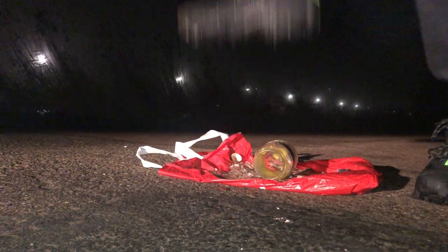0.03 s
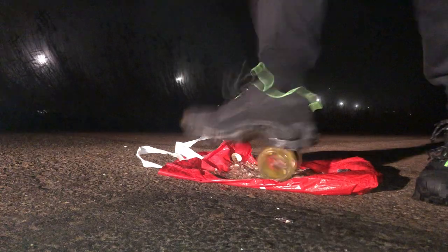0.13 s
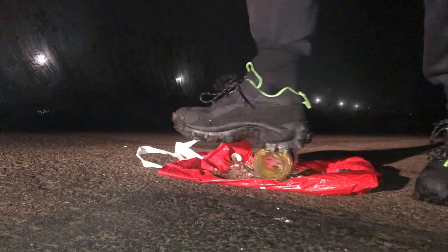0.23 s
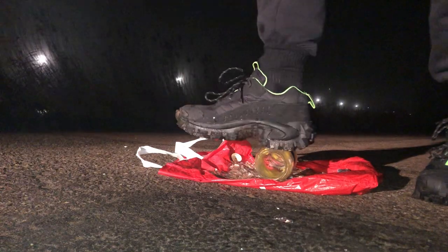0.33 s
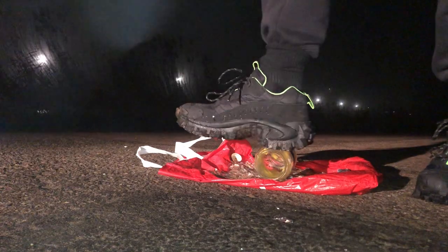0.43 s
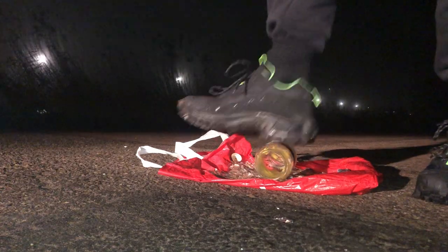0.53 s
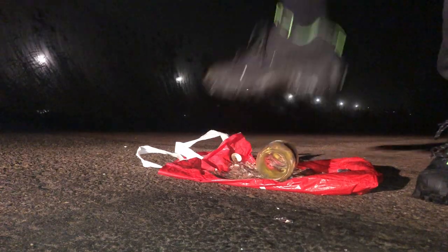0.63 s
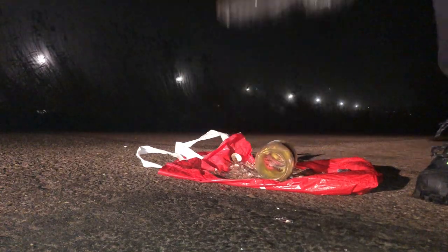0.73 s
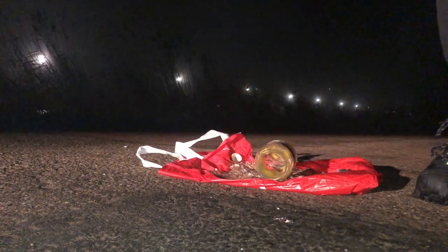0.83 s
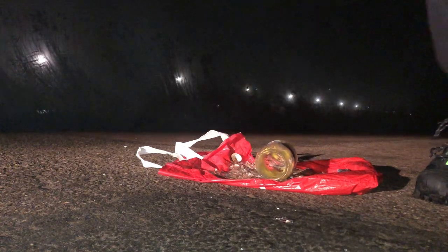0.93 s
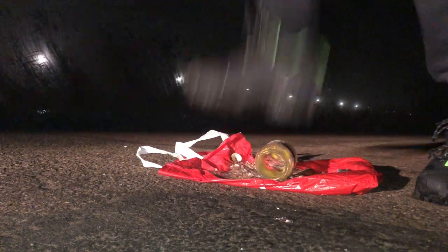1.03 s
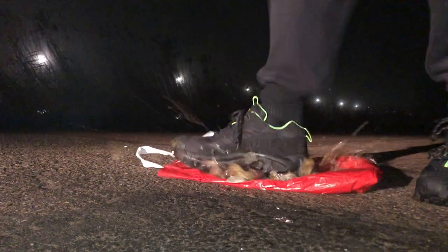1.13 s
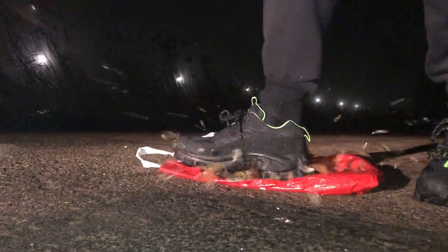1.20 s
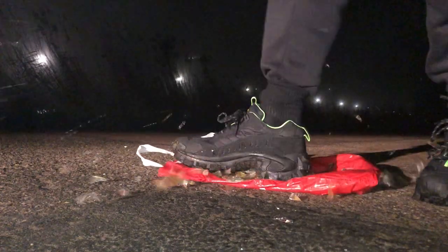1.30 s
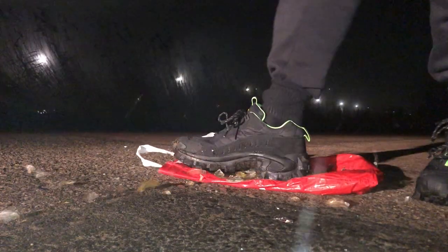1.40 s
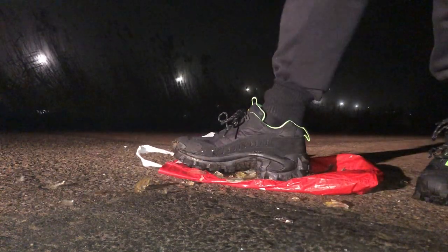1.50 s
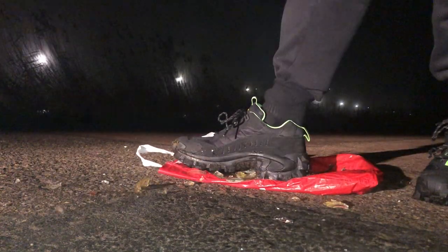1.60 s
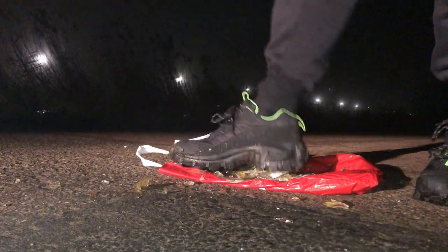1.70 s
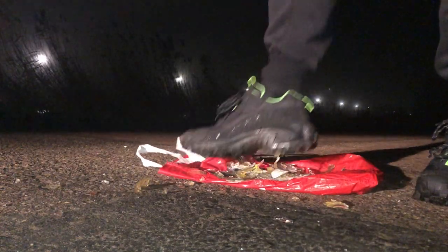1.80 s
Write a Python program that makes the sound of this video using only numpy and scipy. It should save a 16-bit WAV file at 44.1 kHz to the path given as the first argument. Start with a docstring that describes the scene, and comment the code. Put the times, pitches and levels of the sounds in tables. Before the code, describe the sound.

Close, dry outdoor sound of glass being stomped: first a hollow knock with ringing and grinding, about a second later a loud shattering burst, bag crackle and small pieces ticking down, with quiet night hum behind.

```python
"""A low hum of the town at night is heard first, as shaped noise with a few wavering tones. A boot then
stamps on a glass jar lying on a plastic bag on asphalt: the jar rings, skids and grinds, as grit noise
through resonances and damped modes. A second stamp bursts it: snaps of noise crack, a cloud of short
notes shimmers, the sole crushes the pieces, the bag crackles and shards tinkle down on high modes."""
import sys
import numpy as np
from scipy import signal
from scipy.fft import rfft, irfft, next_fast_len
from scipy.io import wavfile
from scipy.ndimage import map_coordinates

SR = 44100
rng = np.random.default_rng(int(sys.argv[2]) if len(sys.argv) > 2 else 0)


def transcribe(signal):
    """Save signal, clipped to [-1, 1], as a 16-bit WAV file at the path in sys.argv[1]."""
    frames = np.atleast_2d(signal).T
    limited = np.clip(frames, -1, 1)
    pcm = np.round(limited * 32767).astype(np.int16)
    wavfile.write(sys.argv[1], SR, pcm)


N = 83790
T = np.arange(SR // 2) / SR  # time axis of one short event, s
SCENE_T = np.arange(N) / SR  # time axis of the whole scene, s


def amp(db):
    """Decibel law: level in dB to amplitude ratio."""
    return 10 ** (np.asarray(db) / 20)


def unit(x):
    """Normalisation to an rms of 1."""
    return x / np.sqrt(np.mean(x ** 2) + 1e-20)


def along(points, hz):
    """Interpolation of (f/Hz, value) points on a logarithmic frequency axis."""
    f, v = np.transpose(points)
    return np.interp(np.log(hz + 1), np.log(f + 1), v)


def level(rows):
    """Envelope: gain per sample, linear in dB between (t/s, level/dB) points."""
    return amp(np.interp(SCENE_T, *np.transpose(rows)))


def wobble(rate):
    """Slow random modulation: a smooth curve through random knots, rate of them a second."""
    knots = rng.standard_normal(int(N * rate / SR) + 4)
    return map_coordinates(knots, [SCENE_T * rate])


def filtered(x, response):
    """Linear filtering: the spectrum of x times a response of frequency."""
    m = next_fast_len(len(x) + SR // 2)
    return irfft(rfft(x, m) * response(np.fft.rfftfreq(m, 1 / SR)), m)[:len(x)]


def colour(x, spectrum):
    """Spectral shaping: x filtered by (f/Hz, level/dB) points, at rms 1."""
    return unit(filtered(x, lambda hz: amp(along(spectrum, hz))))


def grains(spiky_db=0, size=len(T)):
    """Granular noise: white noise whose size jumps every half millisecond."""
    sizes = amp(spiky_db * np.clip(rng.standard_normal(size), -2.5, 2.5))
    return unit(rng.standard_normal(size) * sizes[np.arange(size) // 22])


def fade(t60, rise=1e-4):
    """Exponential decay: a straight rise, then a fall of 60 dB in t60."""
    return np.minimum(T / rise, 1) * 1000.0 ** (-np.maximum(T - rise, 0) / t60)


def ring(hz, t60, rise=1e-4):
    """Damped oscillation: one decaying mode."""
    return np.sin(2 * np.pi * hz * T) * fade(t60, rise)


def add(track, s, x):
    """Superposition: mix x into the track at s seconds."""
    part = track[max(round(s * SR), 0):][:len(x)]
    part += x[:len(part)]


# level of the background above its deep bass (t/s, level/dB)
HUM_LEVEL = [(0, -44.5), (0.36, -43.5), (0.64, -44), (1.14, -44.5), (1.25, -55.5), (1.45, -55), (1.7, -54),
             (1.9, -48.5)]
# level of its deep bass (t/s, level/dB)
RUMBLE_LEVEL = [(0, -45), (0.5, -49), (1.0, -42.5), (1.3, -54.5), (1.6, -54.5), (1.9, -61.5)]
# noise spectrum of the background (f/Hz, level/dB per Hz)
HUM_SPECTRUM = [(15, -41.5), (25, -15.5), (59, -2), (236, -5.5), (451, -13), (516, -6.5), (677, -23),
                (775, -13.5), (936, -22.5), (1700, -17), (2480, -29.5), (3340, -23), (5000, -33),
                (6740, -35.5), (8590, -40.5), (14400, -43.5), (16000, -67.5)]
# low tones (f/Hz, level/dB over the background level)
HUM_TONES = [(68, -20.5), (118.4, -13), (193.5, -12), (240, -11.5), (312, -13.5), (511, -14)]
HUM_NOISE_DB, HUM_WAVER_RAD = -2, 1
RUMBLE_HZ = 160  # upper edge of the deep bass


def hum():
    """Phase and amplitude modulation: low tones waver in a far rumble, which drops around the burst."""
    tones = np.zeros(N)
    for hz, db in HUM_TONES:
        phase = 2 * np.pi * hz * SCENE_T + HUM_WAVER_RAD * wobble(11.58)
        swell = amp(2.5 * wobble(7.8))
        tones += amp(db) * unit(np.sin(phase) * swell)
    whole = tones + amp(HUM_NOISE_DB) * colour(grains(size=N), HUM_SPECTRUM)
    bass = filtered(whole, lambda hz: 1 / (1 + (hz / RUMBLE_HZ) ** 4))
    return level(HUM_LEVEL) * (whole - bass) + level(RUMBLE_LEVEL) * bass


# resonances of the jar pressed under the sole (f/Hz, width/Hz, relative level/dB)
PRESSED_MODES = [(1070, 310, -7.5), (3017, 252, 2.5), (4300, 640, -11), (5200, 170, 0), (6780, 125, -7),
                 (8030, 100, 1), (8560, 260, -1), (10000, 160, -9), (10230, 200, -0.5), (11100, 190, 2.5),
                 (12900, 400, -3.5), (13900, 83, 5.5), (14400, 170, -2), (14900, 300, -2.5)]
# grit heard directly (f/Hz, level/dB per Hz)
GRIT_SPECTRUM = [(200, -2), (900, -2.5), (2000, -8.5), (5000, -0.5), (10000, -4), (16000, -8.5)]
GRIT_DB, GRIT_SPIKY_DB = -3.5, 5  # direct grit level, spread of the grain sizes
PRESSED_VARY_DB = 5  # spread of each resonance's level between strokes


def scrape(stroke):
    """Source and filter: grit under a stroke is heard directly and through the pressed jar's resonances."""
    grit = grains(GRIT_SPIKY_DB, size=len(stroke))
    changes = rng.normal(0, PRESSED_VARY_DB, len(PRESSED_MODES))

    def body(f):
        """Modal response: resonances of alternating sign, at rms 1 over frequency."""
        h = 0
        for k, (centre, width, db) in enumerate(PRESSED_MODES):
            damping = 1j * f * width
            h = h + (-1) ** k * amp(db + changes[k]) * damping / (centre ** 2 - f ** 2 + damping)
        return h / np.sqrt(np.mean(np.abs(h) ** 2))

    through_jar = filtered(grit * stroke, body)
    return through_jar + amp(GRIT_DB) * colour(grit, GRIT_SPECTRUM) * stroke


# free modes of the jar's wall (f/Hz, mean level/dB, t60/s)
WALL_MODES = [(2459, -12, .25), (2907, -16, .2), (4037, -16, .2), (5059, -8, .13), (5547, -4, .13),
              (5792, -9, .19), (6874, -2, .1), (7650, -11, .1), (8403, -6, .07), (9060, -16, .1),
              (9658, -9, .07), (14040, -15, .11), (15250, -19, .1)]
WALL_WAVER_RAD = 0.22  # unsteadiness of each mode's phase


def wall_ring(rise):
    """Modal superposition: the struck glass wall rings in many damped, slightly unsteady modes."""
    wall = 0
    for hz, db, t60 in WALL_MODES:
        waver = WALL_WAVER_RAD * np.interp(T, np.linspace(0, T[-1], 100), rng.standard_normal(100))
        gain = amp(db + rng.normal(0, 1))
        wall = wall + gain * np.sin(2 * np.pi * hz * T + waver) * fade(t60, rise)
    return wall


# contacts of the whole jar with the asphalt
# (t/s, grit level/dB, rise/s, grit t60/s, wall ring level/dB, air note level/dB)
CONTACTS = [(0.2076, -21.5, 0.00067, 0.17, -56.5, -49), (0.2178, -21.5, .001, 0.076, -22.5, -18),
            (0.2275, -27, 0.0038, .06, -29, -47), (0.2796, -18.5, 0.0011, 0.032, -37, -26),
            (0.359, -26.5, 0.0038, 0.071, -58, -40), (0.397, -42, 0.008, .08, -62, -40),
            (0.429, -37, 0.001, 0.052, -64.5, -38), (0.4418, -44, 0.00055, 0.022, -70, -42),
            (0.4528, -30.5, 0.00055, 0.049, -44, -33), (0.478, -47.5, 0.00065, .04, -74, -59),
            (0.5337, -42, .001, 0.098, -52, -36), (0.554, -44, 0.0022, 0.039, -72, -50)]
# steady grinding as the jar rolls (t/s, level/dB)
ROLL_LEVEL = [(0.2, -69), (0.24, -45), (0.3, -49.5), (0.34, -52.5), (0.38, -45.5), (0.46, -55.5),
              (0.5, -59), (0.56, -58), (0.6, -78), (0.7, -100)]
AIR_HZ, AIR_T60_S, AIR_RISE_S = 396, 0.11, 0.0076  # note of the air in the jar
AIR_GLIDE_HZ_PER_S = 54  # later contacts sound a higher air note


def jar():
    """Frictional and impact excitation: the jar skids and rolls, its wall rings and the air inside hoots."""
    first_s = CONTACTS[0][0]
    out = scrape(level(ROLL_LEVEL) * (np.arange(N) > first_s * SR))
    for s, grit_db, rise, t60, wall_db, air_db in CONTACTS:
        air = ring(AIR_HZ + AIR_GLIDE_HZ_PER_S * (s - first_s), AIR_T60_S, AIR_RISE_S)
        grit = scrape(fade(t60, rise))
        add(out, s, amp(grit_db) * grit + amp(wall_db) * wall_ring(rise) + amp(air_db) * air)
    return out


# decay of the open ground (f/Hz, t60/s)
YARD_T60 = [(200, 0.45), (2000, 0.34), (14000, 0.5)]
YARD_DB = -22


def yard(x):
    """Reverberation: convolution with decaying noise gives the answer of the open ground and far walls."""
    hz, t, z = signal.stft(grains(), SR, nperseg=256)
    decay = amp(-60 * t / along(YARD_T60, hz)[:, None])
    tail = signal.istft(z * decay, SR, nperseg=256)[1]
    return signal.fftconvolve(x, tail / np.linalg.norm(tail))[:N]


# short notes of the jar while the sole pinches it (t/s, level/dB, f/Hz, t60/s)
CLACKS = [(0.2077, -20, 3000, 0.022), (0.2145, -18, 6870, .08), (0.2275, -24, 2990, .03),
          (0.28, -18, 2980, 0.014), (0.2815, -18, 8460, 0.047), (0.3622, -29, 3004, .035)]


def clacks():
    """Damped modes: the pinched jar sounds short single notes."""
    out = np.zeros(N)
    for s, db, hz, t60 in CLACKS:
        add(out, s, amp(db) * ring(hz, t60, rise=.001))
    return out


# rubber sole on the jar and the ground; the pitch sinks as the contact spreads
# (t/s, level/dB, starting f/Hz, rise/s, t60/s, sinking/octaves per s)
KNOCKS = [(0.2081, -4.5, 1136, 0.00076, 0.016, 36.5), (0.2104, -4, 354, 0.0027, 0.01, 96),
          (0.2299, -17, 1170, 0.0018, 0.0073, 40), (0.2806, -20, 1048, 0.00095, 0.021, 35),
          (0.2944, -29.5, 1780, .001, 0.028, 31), (1.002, -37, 375, 0.011, 0.084, 62),
          (1.136, -31, 1870, 0.00051, .012, 315), (1.144, -26, 196, 0.0021, 0.066, 15),
          (1.1538, -4.5, 1305, 0.00075, 0.014, 99), (1.1568, -11.5, 350, 0.0018, 0.0187, 60),
          (1.1593, -11, 1682, 0.0016, 0.027, 431), (1.1846, -27, 525, .003, .02, 25),
          (1.1952, -25, 1220, .002, 0.013, 85), (1.338, -40, 1150, .002, .014, 30)]
KNOCK_NOISE_DB, KNOCK_WIDTH_OCT, KNOCK_LOW_HZ = -15, 0.75, 110  # roughness, its half width, lower edge


def boot():
    """Contact stiffness: the sole knocks hollowly, each knock sinking in pitch as the contact spreads."""
    out = np.zeros(N)
    for s, db, hz, rise, t60, sink in KNOCKS:
        note = np.sin(2 * np.pi * np.cumsum(hz * 2 ** (-sink * T)) / SR)

        def around_note(f):
            """Resonance curve centred on the starting pitch."""
            return 1 / (1 + (np.log2((f + 1) / hz) / KNOCK_WIDTH_OCT) ** 2)

        roughness = unit(filtered(grains(), around_note))
        add(out, s, amp(db) * (note + amp(KNOCK_NOISE_DB) * roughness) * fade(t60, rise))
    return signal.sosfilt(signal.butter(2, KNOCK_LOW_HZ, "high", fs=SR, output="sos"), out)


# sharp cracks of glass and grit (t/s, level/dB, t60/s, body level/dB relative to the edge)
CRACKS = [(0.2197, -9.5, 0.0085, 1), (0.6514, -33, 0.0026, -27), (0.7022, -38, 0.0061, -20),
          (1.1363, -36, 0.024, 4), (1.1532, -23, .022, 2), (1.159, -9.5, 0.0099, -1.5),
          (1.1642, -21.5, 0.036, -25), (1.36, -39, .008, -3), (1.394, -33, .006, -10),
          (1.4095, -20, 0.0025, -16.5), (1.4704, -32, 0.0067, -21), (1.4885, -41, 0.014, -16.5),
          (1.544, -38.5, 0.0025, -15), (1.562, -38, .005, -14), (1.5792, -37, .01, -29),
          (1.583, -38.5, 0.0052, -2), (1.6017, -29.5, 0.0039, -6), (1.6757, -41.5, 0.0024, -6),
          (1.695, -44.5, .015, -19), (1.7423, -33, 0.0044, -4.5)]
# bright edge of a crack (f/Hz, level/dB per Hz)
EDGE_SPECTRUM = [(300, -29), (2000, -12), (4000, -0.5), (8000, 1.5), (16000, 0)]
# duller body of a crack (f/Hz, level/dB per Hz)
BODY_SPECTRUM = [(100, -22), (400, -1), (900, -7.5), (1600, -3.5), (3200, -2.5), (6000, -23), (16000, -40)]


def cracks():
    """Impulsive fracture: glass and grit crack in short snaps of broadband noise."""
    out = np.zeros(N)
    for s, db, t60, body_db in CRACKS:
        snap = colour(grains(), EDGE_SPECTRUM) + amp(body_db) * colour(grains(), BODY_SPECTRUM)
        add(out, s, amp(db) * fade(t60) * snap)
    return out


BURST_S = 1.16
SPLINTER_FALL_S = .11  # mean flight time
SPLINTER_DB, SPLINTER_RANGE_DB = -41.5, 14  # loudest splinter, spread below it
SPLINTER_FADE_DB_PER_S = 35  # late splinters land more softly
SPLINTER_LOW_HZ, SPLINTER_HIGH_HZ, SPLINTER_T60_S = 3023, 15460, 0.042  # pitch range, mean decay


def splinters(count=420):
    """Random superposition: tiny splinters ring at exponentially thinning times, a dense shimmer."""
    out = np.zeros(N)
    for when, pitch, size, life in rng.random((count, 4)):
        flight = -SPLINTER_FALL_S * np.log(1 - when)
        hz = SPLINTER_LOW_HZ + (SPLINTER_HIGH_HZ - SPLINTER_LOW_HZ) * pitch
        db = SPLINTER_DB - SPLINTER_RANGE_DB * size - SPLINTER_FADE_DB_PER_S * flight
        add(out, BURST_S + flight, amp(db) * ring(hz, SPLINTER_T60_S * (.5 + life)))
    return out


# crumbs of glass and the bag crackling under the sole (t/s, level/dB)
CRACKLE_LEVEL = [(1.161, -80), (1.17, -34), (1.23, -49), (1.3, -52.5), (1.39, -48), (1.48, -57.5),
                 (1.58, -56), (1.66, -65.5), (1.75, -57), (1.8, -60.5), (1.9, -68)]
# crinkling of the bag (f/Hz, level/dB per Hz)
CRINKLE_SPECTRUM = [(300, 3.5), (1000, 5), (2500, 5), (5000, 5), (10000, -1.5), (16000, -1.5)]
CRINKLE_DB, CRINKLE_SPIKY_DB = -3, 7  # level, spread of the grain sizes
TICKS_PER_S, TICK_DB, TICK_RANGE_DB, TICK_T60_S = 220, -0.5, 24, 0.0027


def crackle():
    """Random impulse process: the bag crinkles and crumbs of glass tick as the weight settles on them."""
    crinkle = colour(grains(CRINKLE_SPIKY_DB, size=N), CRINKLE_SPECTRUM)
    snaps = (rng.random(N) < TICKS_PER_S / SR) * amp(-TICK_RANGE_DB * rng.random(N))
    tick_envelope = signal.fftconvolve(snaps, fade(TICK_T60_S))[:N]
    ticks = colour(tick_envelope * rng.standard_normal(N), EDGE_SPECTRUM)
    after_burst = np.arange(N) > BURST_S * SR
    return level(CRACKLE_LEVEL) * (amp(CRINKLE_DB) * crinkle + amp(TICK_DB) * ticks) * after_burst


# the sole crushing and rubbing the pieces
# (t/s, level/dB, rise/s, t60/s, fizz level/dB relative to the crunch)
CRUSHES = [(1.178, -24, 0.0066, 0.065, 1), (1.203, -31.5, 0.0045, 0.067, -3),
           (1.221, -47.5, 0.022, 0.43, -25), (1.752, -51, .002, 0.045, 7.5)]
# crunch of the pieces (f/Hz, level/dB per Hz)
CRUSH_SPECTRUM = [(60, -1), (250, 2.5), (500, -2), (750, -4), (1150, 2), (1700, -1.5), (2800, -5.5),
                  (4500, -6.5), (8000, -17), (16000, -22)]
CRUSH_SPIKY_DB = 4  # spread of the grain sizes


def crushes():
    """Granular friction: the sole grinds the pieces down, a crunch with a bright fizz."""
    out = np.zeros(N)
    for s, db, rise, t60, fizz_db in CRUSHES:
        crunch = colour(grains(CRUSH_SPIKY_DB), CRUSH_SPECTRUM)
        fizz = colour(grains(CRUSH_SPIKY_DB), EDGE_SPECTRUM)
        add(out, s, amp(db) * fade(t60, rise) * (crunch + amp(fizz_db) * fizz))
    return out


# larger shards landing (t/s, level/dB, f/Hz, t60/s)
SHARDS = [(1.204, -28.5, 11100, .05), (1.206, -37, 4490, 0.061), (1.2784, -36, 11200, 0.055),
          (1.3032, -41.5, 5640, 0.12), (1.335, -32.5, 11000, .05), (1.349, -36.5, 10850, 0.064),
          (1.3674, -18.5, 14300, 0.021), (1.368, -46, 5590, 0.47), (1.3807, -27, 8270, 0.023),
          (1.3943, -39, 13300, 0.029), (1.395, -34, 10900, 0.038), (1.417, -28, 15400, 0.038),
          (1.4202, -35, 8270, 0.022), (1.4362, -23, 14030, .032), (1.439, -41, 12450, 0.087),
          (1.4473, -30.5, 10450, 0.021), (1.4475, -31.5, 6130, 0.057), (1.4537, -32, 6100, 0.077),
          (1.4702, -39, 15400, 0.014), (1.489, -38, 15300, 0.026), (1.5078, -39, 15200, .03),
          (1.5208, -50, 4440, 0.1), (1.563, -42.5, 12430, .09), (1.6018, -43, 15600, 0.048),
          (1.641, -42, 12430, 0.035), (1.675, -49, 6125, .1), (1.696, -43, 6110, 0.087),
          (1.694, -41, 14900, .03), (1.7531, -44, 4130, .03), (1.875, -53.5, 12430, 0.034)]
SHARD_TICK_DB, SHARD_TICK_T60_S, SHARD_RISE_S = -10, 0.012, .0003
SHARD_CHATTER, SHARD_CHATTER_PER_S = 0.34, 500  # depth (as a gain and in radians), random knots a second


def chatter():
    """Random modulation: a jagged curve of straight lines between random knots."""
    knots = rng.standard_normal(len(T))
    return SHARD_CHATTER * np.interp(T * SHARD_CHATTER_PER_S, np.arange(len(T)), knots)


def shards():
    """Impact and modulated mode: each shard ticks on the asphalt and rings high, chattering as it settles."""
    out = np.zeros(N)
    for s, db, hz, t60 in SHARDS:
        tick = amp(SHARD_TICK_DB) * colour(grains(), EDGE_SPECTRUM) * fade(SHARD_TICK_T60_S)
        note = np.sin(2 * np.pi * hz * T + chatter()) * (1 + chatter()) * fade(t60, SHARD_RISE_S)
        add(out, s, amp(db) * (note + tick))
    return out


def scene():
    """Superposition: boot and glass close by, their faint reverberation, and the hum."""
    background = hum()
    near = jar() + clacks() + boot() + cracks() + splinters() + crackle() + crushes() + shards()
    return (near + amp(YARD_DB) * yard(near) + background)[None]


PEAK_LIMIT, TOP_HZ = .68, 16050  # amplitude ceiling, band limit


def record(dry):
    """Saturation and band limiting: the recorder rounds off high peaks and cuts steeply above its band."""
    rounded = dry[0] / (1 + np.abs(dry[0] / PEAK_LIMIT) ** 6) ** (1 / 6)
    return filtered(rounded, lambda hz: 1 / (1 + (hz / TOP_HZ) ** 140))[None]


dry = scene()
out = record(dry)
transcribe(out)
```